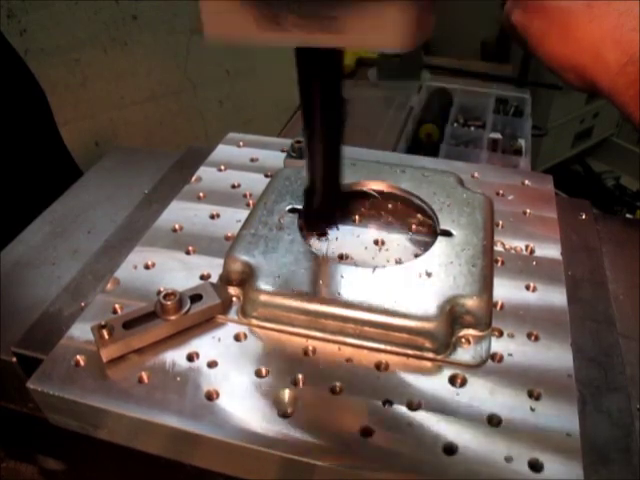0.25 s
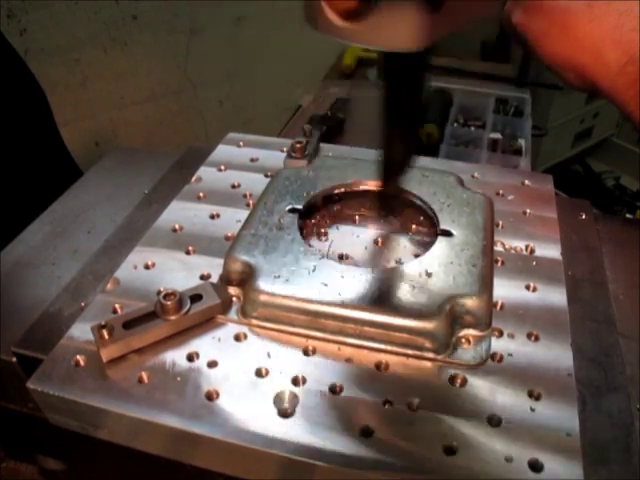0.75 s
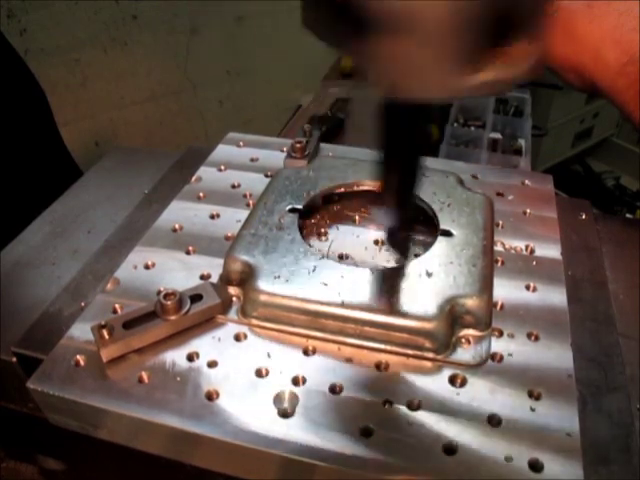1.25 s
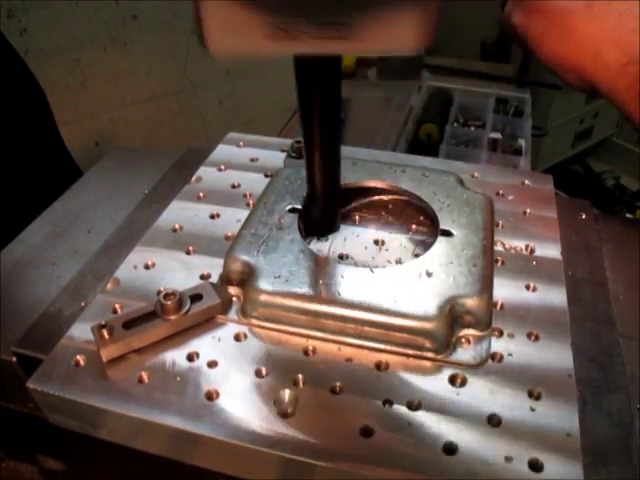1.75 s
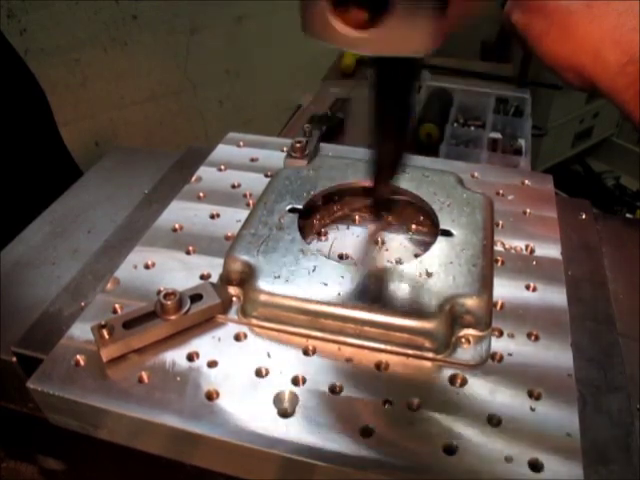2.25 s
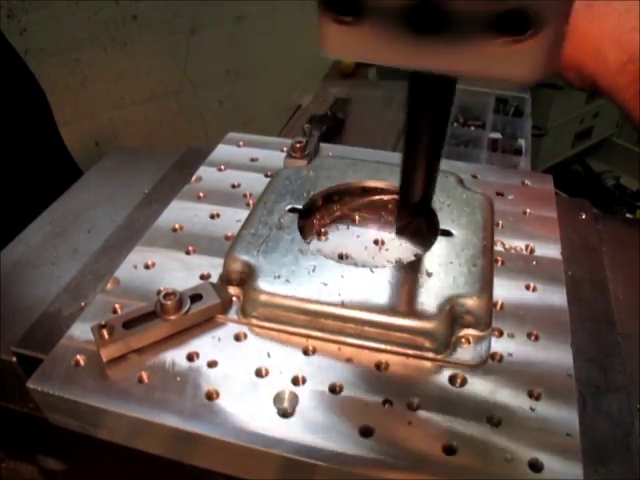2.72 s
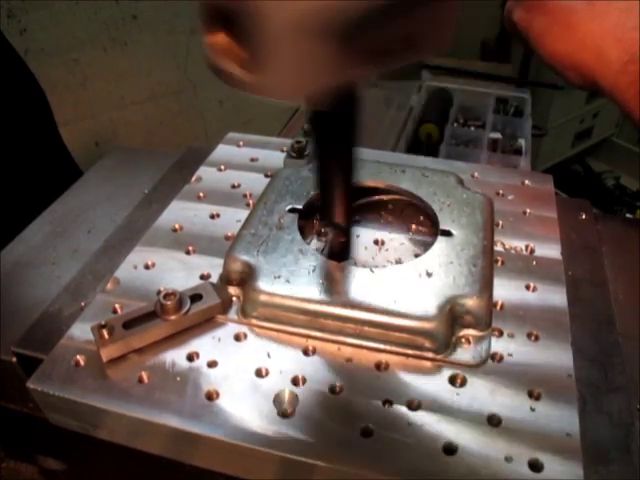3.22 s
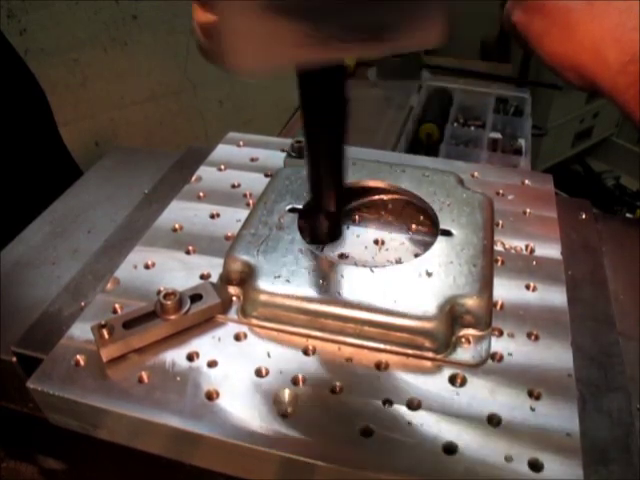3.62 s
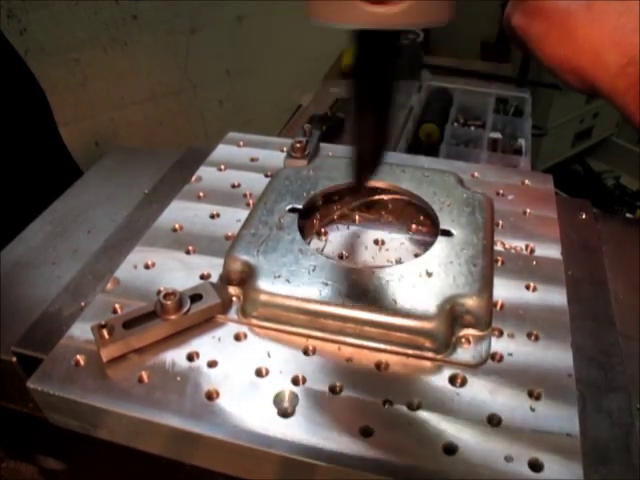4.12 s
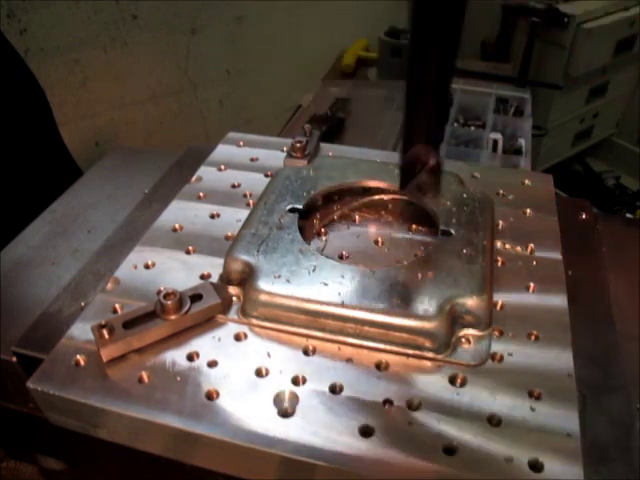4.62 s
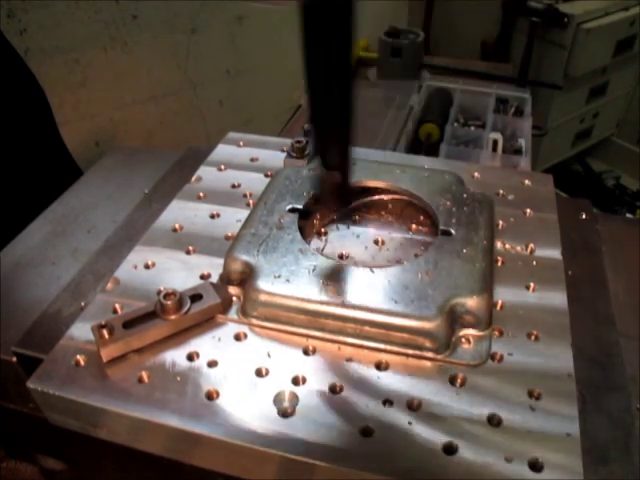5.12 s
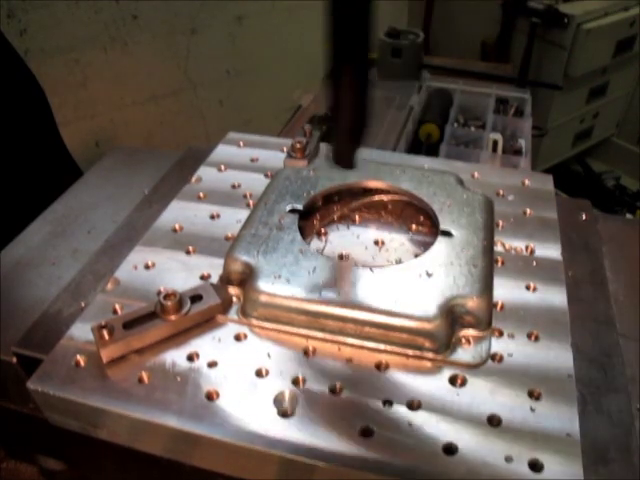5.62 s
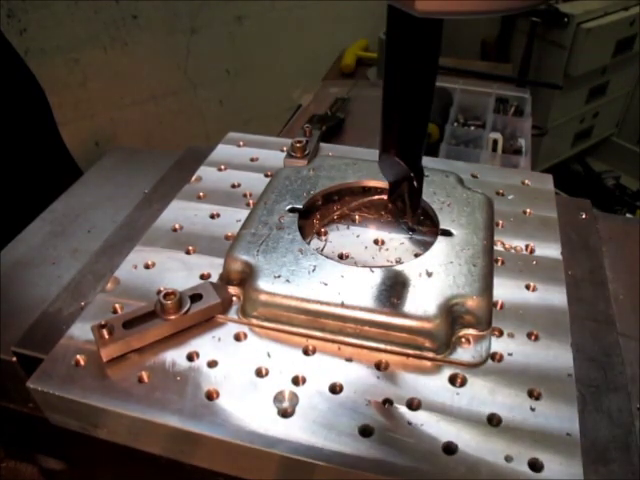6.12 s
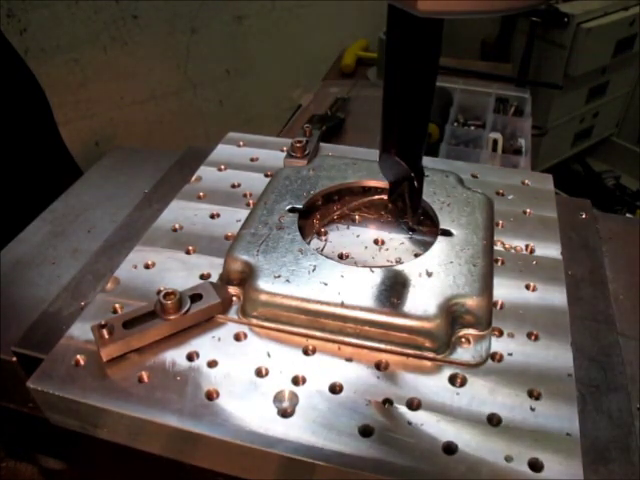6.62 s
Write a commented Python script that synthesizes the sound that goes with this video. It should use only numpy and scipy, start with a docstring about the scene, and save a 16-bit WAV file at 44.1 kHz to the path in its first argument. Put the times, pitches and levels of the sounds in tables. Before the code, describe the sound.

A boring tool on a milling machine cuts a hole in a thin steel pan with a harsh, ringing scrape and snapping chips. The scrape soon breaks into rhythmic rubs with high-pitched squeals, over whining gears and a low drone. After about four seconds the cutting ends; the spindle runs free, knocks once and winds down. Small steel parts clink lightly, heard close in a workshop.

```python
"""A harsh, ringing scrape: a boring head on a milling machine opens a hole in a thin steel pan.
The edge sticks and slips, ringing the boring bar and the sheet and snapping off chips. It scrapes all
round at first, then only catches the rim on each turn, squealing, until it breaks through.
Gears whine over the frame's drone; the spindle runs free, is switched off and winds down.
Small steel parts clink in the workshop."""
import sys
import numpy as np
from scipy import signal
from scipy.fft import rfft, irfft, next_fast_len
from scipy.io import wavfile

SR = 44100
rng = np.random.default_rng(int(sys.argv[2]) if len(sys.argv) > 2 else 0)


def file_out(sig):
    """Save sig as 16-bit WAV at sys.argv[1]."""
    # one column per channel
    cols = np.atleast_2d(sig).T
    # limit, then scale
    lim = np.clip(cols, -1, 1)
    pcm = np.round(lim * 32767).astype(np.int16)
    wavfile.write(sys.argv[1], SR, pcm)


N = 302526
TIME = np.arange(N) / SR
TURNS_PER_S = 2.645   # of the tool while it cuts

# how loud the machine sounds, slowly swelling, then dying away as it stops: time_s, level_db
MACHINE_LEVEL = [(0, -40.5), (1.45, -39.5), (2.12, -37), (5.79, -28.5), (6.25, -43.5), (6.73, -56)]
# the spindle runs, then brakes: time_s, share_of_full_speed, braking_whine_db
SPINDLE = [(0, 0.98, -0.5), (5.35, 1, 0.5), (5.5, 0.91, 1), (5.69, 0.9, 5.5), (5.81, 0.66, 9),
           (5.9, 0.67, -7), (6.2, 0.37, 4), (6.4, 0.021, -20)]


def cutting(bar_push, sheet_push, catch_s=0.012, halving_db=22, judder_db=2.5):
    """The edge's jolts ring the bar and the sheet; the tearing chip adds grit and snaps."""
    # the edge catches and snaps off a chip: time_s, peak_db, chatter_db, snap_db
    catches = [(0.0925, -15, -14.5, -34), (0.2467, -9, -30, -47), (0.358, -7, -32, -34),
               (0.5768, -5, -23, -37), (0.7716, -11, -21, -28), (0.896, -19, -33, -33),
               (0.9612, -14, -29, -53), (1.0084, -18, -25, -53), (1.0909, -10, -18.5, -42),
               (1.189, -7, -20.5, -41), (1.224, -10, -26, -45), (1.4597, -6, -19, -44),
               (1.5626, -13.5, -22.5, -58), (2.007, -7, -19.5, -53), (2.404, -6.5, -21.5, -40),
               (2.429, -12, -16.5, -40), (2.472, -10, -26, -52), (2.7635, -6, -26.5, -42),
               (2.8469, -6.5, -25, -53), (3.2244, -4, -33, -43), (3.5167, -7.5, -15.5, -50),
               (3.5708, -2.5, -34, -34), (3.6593, -10.5, -13, -40), (3.906, -7, -17, -45),
               (3.932, -10.5, -22, -57)]
    # resonances of the boring bar and the sheet: pitch_hz, width_hz, level_db
    bar_modes = [(3020, 220, -5.5), (3647, 46, 5.5), (4734, 160, -3), (5300, 55, -1.5), (5727, 57, 6),
                 (6540, 78, -19), (6640, 52, -6), (7376, 145, 4), (7860, 103, 1.5), (8870, 72, 10),
                 (9200, 27, 5), (9690, 97, 1), (10000, 46, -25), (10580, 103, 1.5), (11100, 59, -2.5),
                 (14300, 200, -16)]
    sheet_modes = [(1603.5, 40.4, 5), (1832, 66, -3), (2110, 210, -8.5), (2352, 73, 1)]
    # tone colours of the chip tearing and snapping: frequency_hz, level_db
    grit_spectrum = [(1400, 5), (1900, 5.5), (2500, 3), (3000, 1.5), (4100, -6.5), (4800, 12.5),
                     (6400, -12.5), (8200, 12.5), (10500, -3.5), (12000, -8.5), (15500, -19)]
    snap_spectrum = [(1500, -31), (3000, -1), (5200, 13), (8000, -22), (10500, 14), (12000, -9),
                     (15500, -23)]
    start, peak_db, chatter_db, snap_db = np.transpose(catches)
    # a brittle snap is over at once, a dull one tears for longer
    lengths = catch_s * 2 ** ((snap_db.mean() - snap_db) / halving_db)
    judder = from_db(-1 + judder_db * np.tanh(drift(41)))
    on_bar = np.hypot(judder * bar_push, bursts(start, peak_db - 12, lengths, shape=1.9))
    on_sheet = np.hypot(judder * sheet_push, bursts(start, chatter_db - 1, lengths, shape=2.4))
    jolts = slips(per_s=3500, spread_db=2.5)
    bar = resonate(on_bar * jolts, bar_modes, flare_db=3)
    bar = sway(filtered(bar, "band", [2200, 13000]), share=0.0023)
    sheet = resonate(on_sheet * jolts, sheet_modes, flare_db=2.5)
    sheet = sway(filtered(sheet, "band", [1350, 2900], order=3), share=0.0197)
    tearing = on_bar * slips(per_s=4000, spread_db=1)
    # the sharper the snap, the more abruptly the edge bites
    bite = bursts(start, snap_db + 21, decay_s=0.003) * rng.standard_normal(N)
    grit = colour(tearing + bite, grit_spectrum)
    snaps = bursts(start, snap_db + 12, decay_s=0.0056) * noise(snap_spectrum)
    return bar + from_db(-1) * sheet + from_db(-5) * grit + snaps


def contact(notch_at_s=0.265, notch_s=0.0059, notch_dip_db=14):
    """How hard the edge works on the bar and on the sheet: the full cut, then the rubs."""
    # the first cut, all round the hole: time_s, scrape_db, chatter_db
    full_cut = [(0.0, -20, -23), (0.11, -25, -22.5), (0.182, -26.5, -28), (0.498, -22, -20.5),
                (0.556, -25.5, -27.5), (0.904, -27.5, -27.5), (0.93, -34, -40)]
    # how freely the sheet answers a rub: time_s, chatter_over_scrape_db
    sheet_answer = [(1.05, 3.5), (1.28, 8), (1.7, -5), (3.2, -6), (3.7, -1.5)]
    bar_db, sheet_db = in_time(full_cut, right=-120)
    # once a turn the edge crosses a notch in the rim and the scrape dips
    turns_from_notch = ((TIME - notch_at_s) * TURNS_PER_S + 0.5) % 1 - 0.5
    dip_db = notch_dip_db * np.exp(-(turns_from_notch / TURNS_PER_S / notch_s) ** 2)
    bar = from_db(bar_db + 1.5 - dip_db + np.tanh(drift(25)))
    sheet = from_db(sheet_db + 2 - dip_db + np.tanh(drift(9.8)))
    start, length, rub_db, _, _ = rubs()
    chatter_db = rub_db + np.interp(start, *np.transpose(sheet_answer))
    bar += swells(zip(start, length, rub_db), rise_s=0.0048, fall_s=0.0052)
    sheet += swells(zip(start, length, chatter_db), rise_s=0.0098, fall_s=0.0052)
    return bar, sheet


def rubs():
    """The tool rubs the high parts of the rim and grazes a spot on the far side once a turn."""
    # touches on the rim: start_s, length_s, scrape_db, lower_squeal_db, upper_squeal_db
    rim_rubs = [(0.923, 0.052, -33, -35, -35), (1.034, 0.023, -40.5, -39, -54),
                (1.077, 0.1, -39.5, -44, -35), (1.175, 0.11, -30.5, -40, -56),
                (1.353, 0.038, -36, -39, -52), (1.598, 0.059, -32, -37, -36.5),
                (1.755, 0.017, -36.5, -53, -52), (1.961, 0.099, -29.5, -33, -36),
                (2.079, 0.068, -34, -41.5, -40.5), (2.388, 0.092, -24.5, -29, -30),
                (2.759, 0.13, -33, -35.5, -36.5), (3.136, .13, -29.5, -33.5, -35),
                (3.504, 0.13, -24.5, -36, -42), (3.674, 0.042, -21.5, -40, -42),
                (3.731, 0.21, -26.5, -54, -47)]
    # as the tool sinks, each graze comes earlier, lasts longer and is louder
    turn = np.arange(5)
    start_s = 1.888 + turn * (1 / TURNS_PER_S - 0.01)
    length_s = 0.038 + 0.0074 * turn
    scrape_db, squeal_db = -40 + 1.5 * turn, -48 + 2.5 * turn
    return np.hstack([np.transpose(rim_rubs), [start_s, length_s, scrape_db, squeal_db, squeal_db]])


def sway(x, share):
    """The pitch sways as the point of contact travels round the hole."""
    rad_per_s = 2 * np.pi * TURNS_PER_S
    return np.interp(TIME + share / rad_per_s * np.sin(rad_per_s * (TIME - 0.46)), TIME, x)


def squeal(lower_hz=7334, upper_hz=8860, flutter_db=4.5):
    """The rubbing bar locks onto two modes; the lower carries a lingering sub-octave and an octave."""
    start, length, _, lower_db, upper_db = rubs()
    lower = swells(zip(start, length, lower_db), rise_s=0.038, fall_s=0.023)
    lower *= from_db(flutter_db * drift(41))
    sub = swells(zip(start, length, lower_db - 7), rise_s=0.021, fall_s=0.04)
    sub *= from_db(flutter_db * drift(25))
    upper = swells(zip(start, length, upper_db), rise_s=0.0067, fall_s=0.035)
    upper *= from_db(flutter_db * drift(38))
    phase = 2 * np.pi * np.cumsum(lower_hz + 6 * drift(25.3)) / SR
    stack = sub * np.sin(phase / 2) + lower * (np.sin(phase) + from_db(-25) * np.sin(2 * phase))
    return np.sqrt(2) * stack + upper * tone(upper_hz, wander_hz=26, wander_rate=48.6)


def sizzle(push, level_db=-42, full_push_db=-35, flutter_db=4):
    """Even the lightest touch sizzles as the edge shaves the burr; pressing harder adds no more."""
    burr = noise([(7000, -9), (9000, 2), (10600, 11.5), (12000, -20),
                  (13500, -8), (14700, -13), (15600, -22)])
    return from_db(level_db + flutter_db * drift(45)) * np.tanh(push / from_db(full_push_db)) * burr


def rim(pitch_hz=3468, t60_s=0.43, shaken_db=-53):
    """One mode of the rim sings on after a hard catch, and faintly while the machine shakes it."""
    # hard catches: start_s, level_db
    strikes = [(1.092, -33), (1.459, -30), (2.41, -33), (3.57, -29), (3.94, -38)]
    start, db = np.transpose(strikes)
    struck = bursts(start, db, t60_s / np.log(1000)) * tone(pitch_hz, wander_hz=4.7, wander_rate=7.7)
    shaken = resonate(rng.standard_normal(N), [(pitch_hz, 30, 0)], flare_db=1.5)
    speed, _ = in_time(SPINDLE)
    return struck + from_db(shaken_db) * speed ** 2 * shaken


def free_bar(start_s=5.03, length_s=0.5, level_db=-48, pitch_hz=3660, width_hz=150):
    """Lifted clear of the hole, the spinning bar sings faintly at one mode."""
    ring = resonate(rng.standard_normal(N), [(pitch_hz, width_hz, 0)], flare_db=6)
    return swells([(start_s, length_s, level_db)], rise_s=0.092, fall_s=0.12) * ring


def gear_train(level, mesh_hz=1025.6, waver_db=2):
    """Gears rattle and whine, bearings whirr; as the spindle brakes, the whine fades, the mesh growls."""
    # gears under power, gears coasting, bearings: frequency_hz, level_db
    driven_spectrum = [(53, -35), (90, -4.5), (192, -1.5), (329, -9), (455, -1), (503, -9), (940, -7),
                       (1010, -8), (1090, -11.5), (1300, -9.5), (1690, -41), (2860, -120)]
    coasting_spectrum = [(53, -25), (90, -10), (146, -9), (195, -2), (284, -17), (440, -6), (492, -16.5),
                         (608, -5.5), (899, -10.5), (1060, -13), (1300, -15), (1690, -53), (2860, -120)]
    bearing_spectrum = [(1350, 3), (1600, 6), (2100, 1), (2600, -5), (3450, -0.5), (4100, -7.5),
                        (4700, -5.5), (6500, -10.5), (10000, -14.5), (15000, -61)]
    # whining tones and a ringing resonance of the running machine: pitch_hz, relative_db
    running_tones = [(361, -45.5), (463, -41), (598, -46.5), (721, -46.5), (1198, -45.5)]
    speed, braking_db = in_time(SPINDLE)
    driven = np.clip((speed - 0.65) / 0.33, 0, 1)
    gears = np.sqrt(driven) * from_db(-2) * noise(driven_spectrum)
    gears += np.sqrt(1 - driven) * from_db(-1.5) * noise(coasting_spectrum)
    whirr = from_db(np.interp(speed, [0.6, 0.7], [-10, -7])) * noise(bearing_spectrum)
    rattle = (gears + whirr) * from_db(drift(45))
    whine = 0
    for hz, db in running_tones:
        gain = from_db(db + 30 + waver_db * drift(7.8))
        whine += gain * tone(hz * speed, wander_hz=3.47, wander_rate=20.56)
    mesh = from_db(braking_db - 9 + waver_db * drift(29))
    mesh *= tone(mesh_hz * speed, wander_hz=4.5 + 190 * (1 - speed), wander_rate=85)
    return level * (rattle + speed ** 7 * whine + speed * mesh)


def gear_level(push, load_db=-12, settle_s=0.035):
    """The gears run louder while the cut loads them."""
    pole = np.exp(-1 / (settle_s * SR))
    load, _ = signal.lfilter([1 - pole], [1, -pole], push, zi=push[:1])
    return np.hypot(from_db(in_time(MACHINE_LEVEL)[0]), from_db(load_db) * load)


def spindle_swish():
    """The free-running spindle gives off dry swishes."""
    # swishes: start_s, length_s, relative_db
    swishes = [(4.5, 0.089, -39.5), (4.67, 0.4, -38.5), (5.2, 0.55, -40.5), (5.68, .18, -41),
               (6.19, 0.091, -46)]
    # their airy hiss: frequency_hz, level_db
    hiss_spectrum = [(5000, -28), (8000, 0.5), (10500, -2), (12000, -16), (15000, -26)]
    return from_db(-5) * swells(swishes, rise_s=0.015, fall_s=0.049) * noise(hiss_spectrum)


def clack(start_s=5.675, level_db=-28):
    """The gear train knocks once through its backlash as the spindle brakes."""
    knock = noise([(600, -9), (1700, 3), (3400, 1), (5000, -14)])
    return bursts([start_s], [level_db], decay_s=0.038) * knock


def frame(upper_hz=103):
    """The heavy frame drones at its lowest mode, faintly at a second one, over an uneven rumble."""
    # shakes as the head lifts and the spindle brakes: start_s, length_s, drone_db, rumble_db
    shakes = [(4.18, 0.093, -43, -27), (5.415, 0.31, -23.5, -29), (5.98, 0.069, -25, -36),
              (6.169, 0.089, -32.5, -50)]
    # the lowest mode: time_s, pitch_hz
    drone_pitch = [(0, 58.15), (5.3, 55.4), (5.62, 54.83), (5.95, 56.8), (6.4, 58.2)]
    # the rumble: frequency_hz, level_db
    rumble_spectrum = [(7.1, -32), (12, 6), (27, -12), (45, -8), (58, -36), (99, -120)]
    machine_db = in_time(MACHINE_LEVEL)[0]
    start, length, drone_db, rumble_db = np.transpose(shakes)
    drone_shake = swells(zip(start, length, drone_db), rise_s=0.026, fall_s=0.044)
    rumble_shake = swells(zip(start, length, rumble_db), rise_s=0.015, fall_s=0.2)
    modes = tone(in_time(drone_pitch)[0], wander_hz=0.61, wander_rate=7.2)
    modes += from_db(-17) * tone(upper_hz, wander_hz=4.2, wander_rate=11.3)
    drone = np.hypot(from_db(machine_db + 3), drone_shake) * modes
    rumble = np.hypot(from_db(machine_db - 7), rumble_shake) * noise(rumble_spectrum)
    return drone + rumble


def clinks(split_hz=6500, crack_s=0.005, high_modes_hz=8700):
    """Steel parts touch with a short crack; dull touches ring the low modes, bright ones the high."""
    # touches: start_s, crack_db, relative_treble_db, ring_db
    touches = [(5.3, -16.5, 7.5, -60), (6.092, -28, 3, -62), (6.304, -42, -8, -47),
               (6.31, -32.5, 4.5, -34.5), (6.331, -34, 16, -26.5), (6.435, -34.5, 7.5, -47),
               (6.648, -37, -6, -45), (6.8, -32, 8, -43), (6.842, -31.5, -26, -44)]
    # the parts' modes: pitch_hz, level_db, t60_s
    part_modes = [(4850, 2.5, 0.062), (7860, 6, 0.068), (9270, 0, 0.036), (9900, 10.5, 0.019),
                  (11700, -2, 0.033), (12980, -15, .04), (14200, -12, .024), (15200, -17, .024)]
    # the crack: frequency_hz, level_db
    crack_spectrum = [(800, 11), (2000, 5), (3500, 13.5), (9500, 0.5), (12000, -20), (15500, -29)]
    start, crack_db, treble_db, ring_db = np.transpose(touches)
    crack = from_db(1) * noise(crack_spectrum)
    out = filtered(crack, "low", split_hz) * bursts(start, crack_db, crack_s)
    out += filtered(crack, "high", split_hz) * bursts(start, crack_db + treble_db, crack_s)
    tilt_db = 3.9 * (treble_db - 6)
    for hz, mode_db, t60_s in part_modes:
        muted_db = np.clip(tilt_db if hz < high_modes_hz else -tilt_db, 0, 22)
        ring = bursts(start, ring_db + mode_db - muted_db, t60_s / np.log(1000))
        out += ring * np.sin(2 * np.pi * hz * TIME)
    return out


def shuffle():
    """Something is shifted softly nearby after the machine has stopped."""
    # the movement: start_s, length_s, level_db
    shifts = [(6.79, .07, -42.5)]
    dull_rub = noise([(110, 6), (450, 4), (900, -17), (2000, -5), (5000, -26)])
    return swells(shifts, rise_s=0.025, fall_s=0.03) * dull_rub


def workshop_reverb(x, t60_s=0.37, wet_db=-12, predelay_s=0.004):
    """The walls and the machine add a short diffuse tail."""
    t = TIME[:SR // 2]
    tail = rng.standard_normal(len(t)) * from_db(-60 * t / t60_s) * (t > predelay_s)
    return x + from_db(wet_db) * signal.fftconvolve(x, tail / np.linalg.norm(tail))[:N]


def room_tone(level_db=-42):
    """The shop's steady bed of low rumble and faint hiss."""
    # the background: frequency_hz, level_db
    shop_spectrum = [(24, -27), (40, 4.5), (98, -18), (213, -22.5), (343, -22.5), (1170, -41), (1580, -23),
                     (1740, -29), (6550, -34), (9520, -26.5), (15700, -58.5)]
    return from_db(level_db) * noise(shop_spectrum)


def slips(per_s, spread_db):
    """Stick and slip: dense tiny jolts of uneven size."""
    sizes = from_db(spread_db * np.minimum(rng.exponential(1, N), 4)) * rng.choice([-1, 1], N)
    return rms_one(sizes * (rng.random(N) < per_s / SR))


def resonate(x, modes, flare_db):
    """Parallel (pitch_hz, width_hz, level_db) resonances, each flaring at random."""
    out, power = 0, 0
    for k, (hz, width, db) in enumerate(modes):
        radius = np.exp(-np.pi * width / SR)
        push = x * from_db(db + flare_db * np.tanh(drift(42))) * (1 - radius ** 2) / 2
        poles = [1, -2 * radius * np.cos(2 * np.pi * hz / SR), radius ** 2]
        out += (-1) ** k * signal.lfilter([1, 0, -1], poles, push + 1e-18)
        power += from_db(2 * db) * (1 - radius)
    return out / np.sqrt(power)


def bursts(starts, levels_db, decay_s, shape=1):
    """Envelope of sudden starts that die away; a higher shape holds longer, then drops."""
    power, t = np.zeros(N), TIME[:SR]
    for start, db, decay in np.broadcast(starts, levels_db, decay_s):
        at = round(start * SR)
        burst = from_db(db) * np.exp(-(t / decay) ** shape)
        power[at:at + SR] += burst[:N - at] ** 2
    return np.sqrt(power)


def swells(rows, rise_s, fall_s):
    """Envelope of (start_s, length_s, level_db) rows: each builds up, holds and dies away."""
    out, t = np.zeros(N), TIME[:SR]
    attack = 1 - np.exp(-t / rise_s)
    for start, length, db in rows:
        at = round(start * SR)
        release = np.exp(-np.maximum(t - length, 0) / fall_s)
        out[at:at + SR] += (from_db(db) * attack * release)[:N - at]
    return out


def tone(hz, wander_hz, wander_rate):
    """A sine of unit power whose pitch wanders."""
    return np.sqrt(2) * np.sin(2 * np.pi * np.cumsum(hz + wander_hz * drift(wander_rate)) / SR)


def noise(spectrum):
    """Coloured noise of unit power."""
    return rms_one(colour(rng.standard_normal(N), spectrum))


def colour(x, spectrum):
    """Causal filter through (frequency_hz, level_db) points, with steep skirts."""
    hz, db = np.transpose(spectrum)
    size = 2 * next_fast_len(N // 2 + SR // 10, real=True)
    octave, points = np.log2(np.maximum(np.fft.rfftfreq(size, 1 / SR), 1)), np.log2(hz)
    outside = np.abs(octave - np.clip(octave, points[0], points[-1]))
    gain = rms_one(from_db(np.interp(octave, points, db) - np.minimum(36 * outside, 70)))
    # minimum phase keeps the attacks sharp
    cepstrum = irfft(np.log(gain))
    cepstrum[1:size // 2] *= 2
    cepstrum[size // 2 + 1:] = 0
    return irfft(rfft(x, size) * np.exp(rfft(cepstrum)))[:N]


def filtered(x, kind, hz, order=2):
    """A gentle low, high or band pass."""
    return signal.sosfilt(signal.butter(order, hz, kind, fs=SR, output="sos"), x)


def drift(rate_hz, hop=20, warmup=4000):
    """Smooth random motion with a spread of 1."""
    pole = np.exp(-2 * np.pi * hop * rate_hz / SR)
    white = rng.standard_normal(N // hop + warmup + 2)
    slow = signal.lfilter([1], [1, -2 * pole, pole ** 2], white)[warmup:]
    return np.interp(np.arange(N) / hop, np.arange(len(slow)), rms_one(slow))


def in_time(rows, **ends):
    """One curve for each column after time_s."""
    times, *columns = np.transpose(rows)
    return [np.interp(TIME, times, column, **ends) for column in columns]


def from_db(db):
    """Decibels to gain."""
    return 10 ** (np.asarray(db) / 20)


def rms_one(x):
    """Scale to unit power."""
    return x / np.sqrt(np.mean(x ** 2) + 1e-20)


def scene():
    """Cut and clinks in the room, over the machine and the shop's background."""
    bar_push, sheet_push = contact()
    near = workshop_reverb(cutting(bar_push, sheet_push) + sizzle(bar_push) + clinks() + clack())
    near += squeal() + rim() + free_bar() + shuffle()
    machine = gear_train(gear_level(sheet_push)) + spindle_swish() + frame()
    return (near + machine + room_tone())[None]


def record(dry, cutoff_hz=15900):
    """The top treble is cut steeply."""
    return signal.sosfilt(signal.ellip(10, 0.1, 80, cutoff_hz, fs=SR, output="sos"), dry)


dry = scene()
out = record(dry)
file_out(out)
```